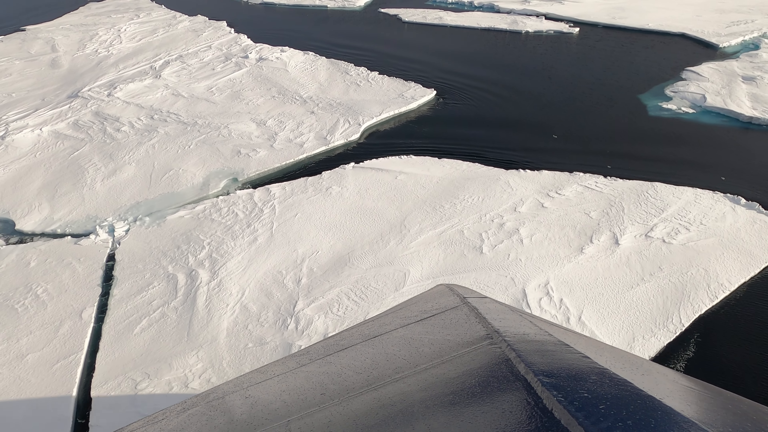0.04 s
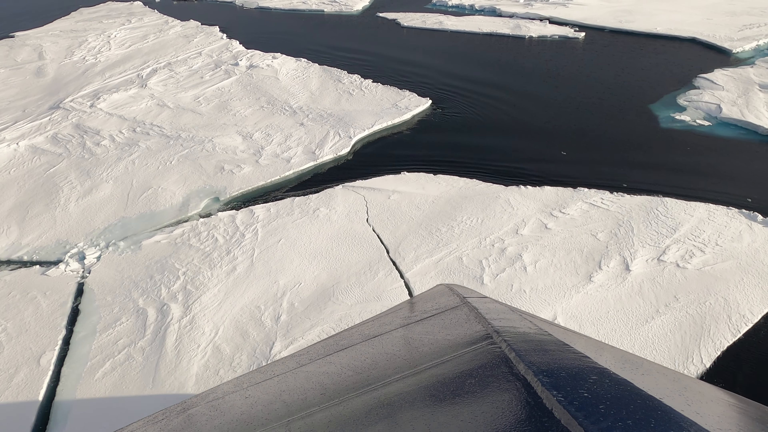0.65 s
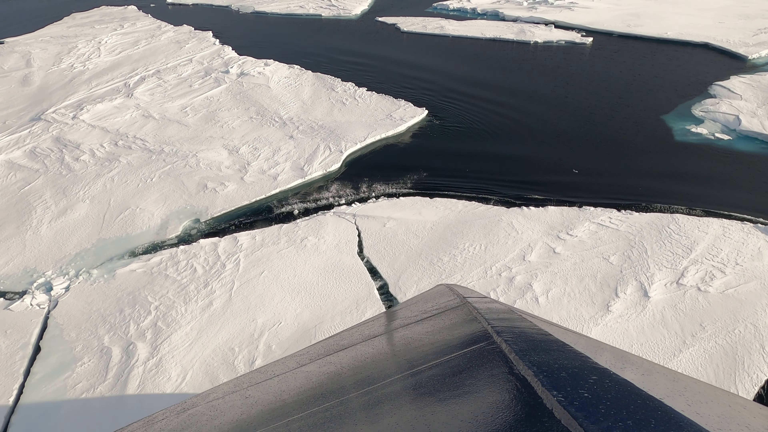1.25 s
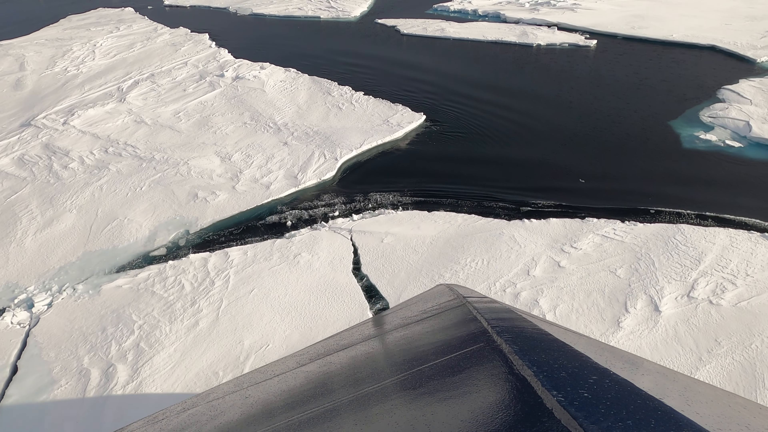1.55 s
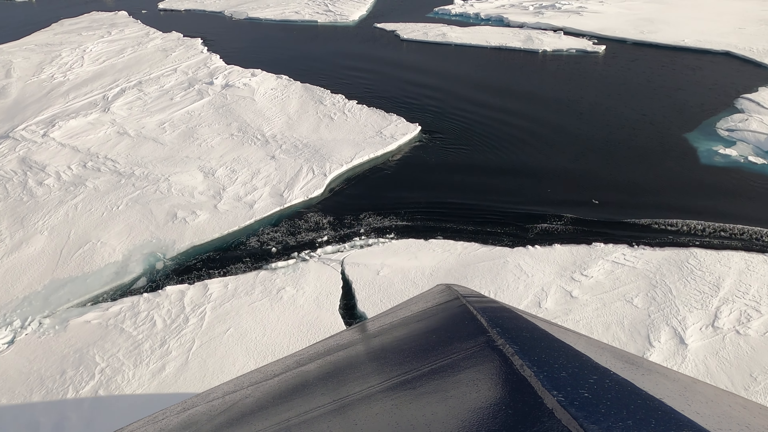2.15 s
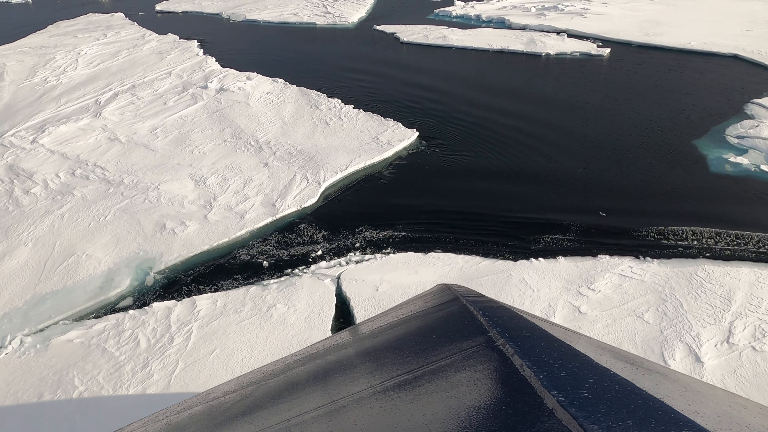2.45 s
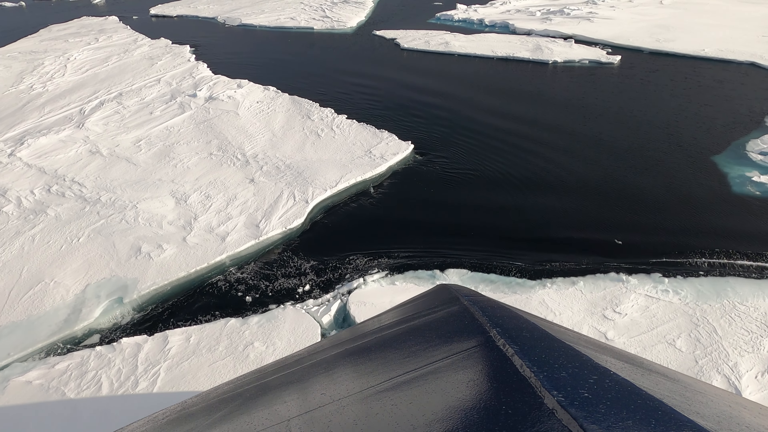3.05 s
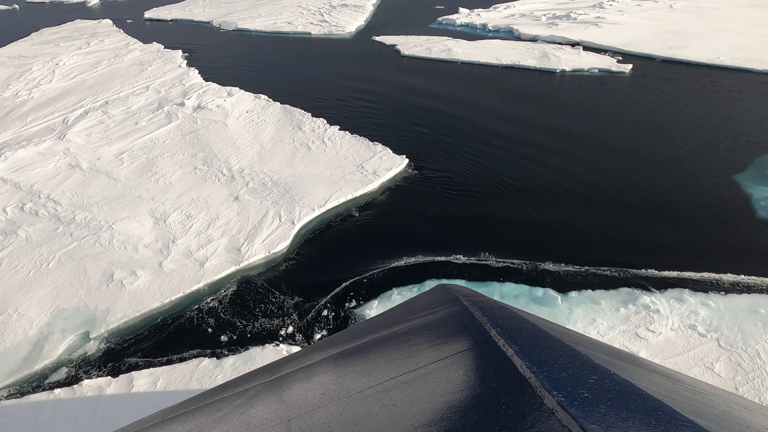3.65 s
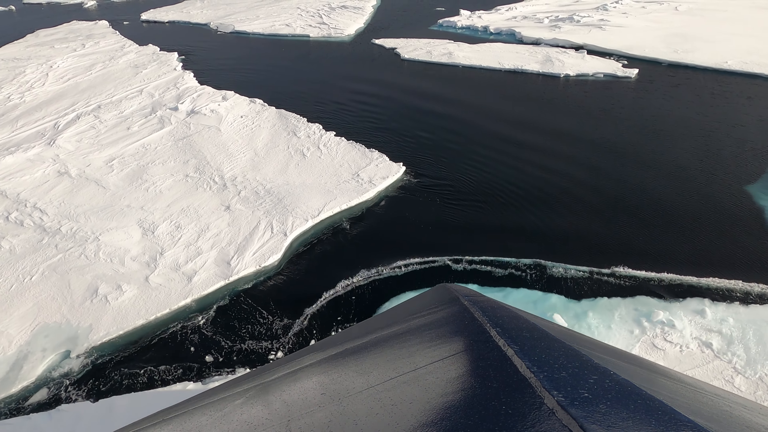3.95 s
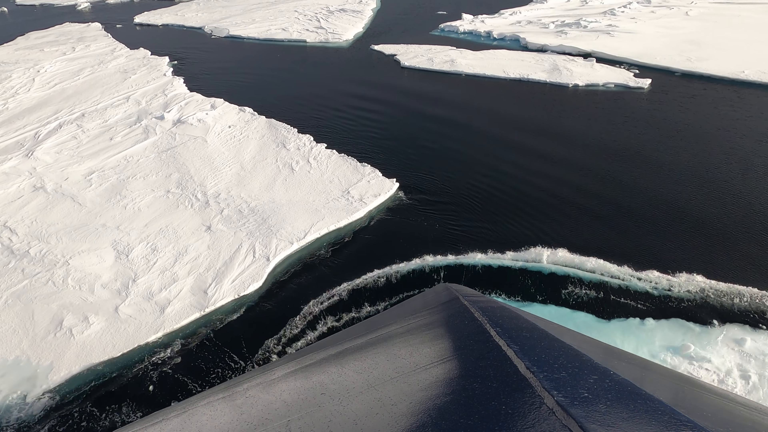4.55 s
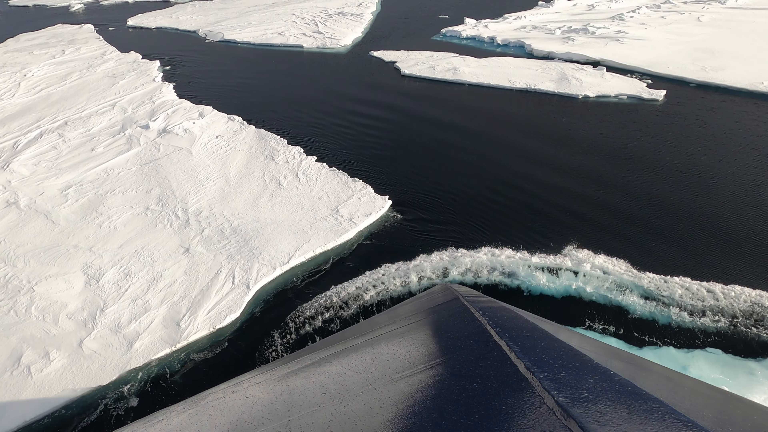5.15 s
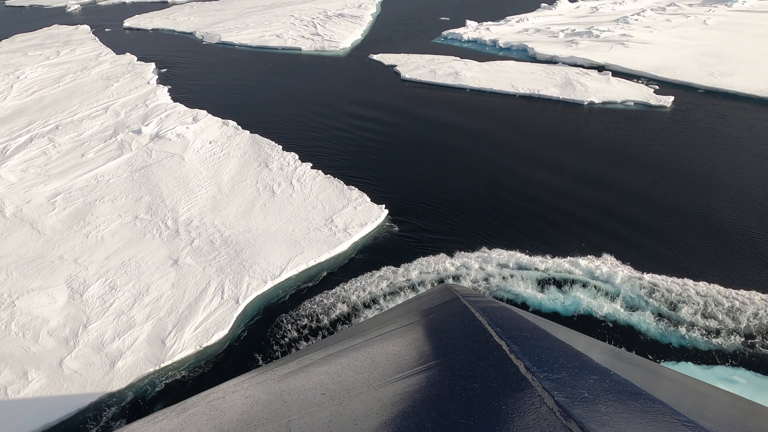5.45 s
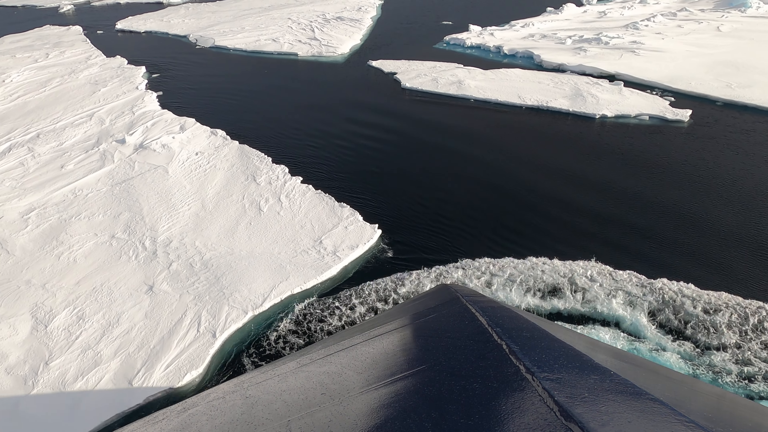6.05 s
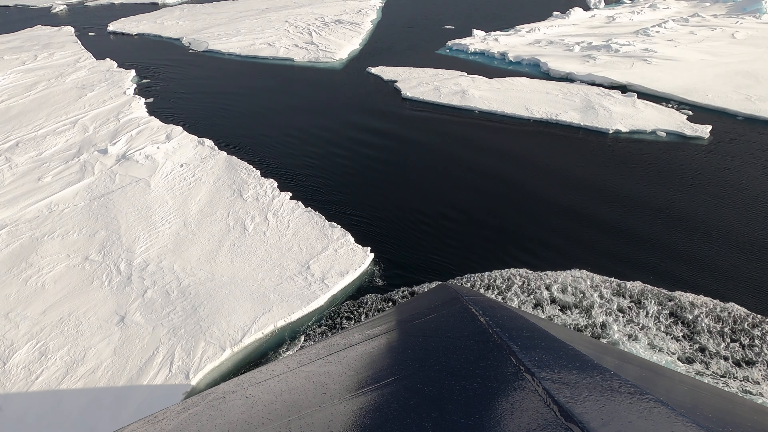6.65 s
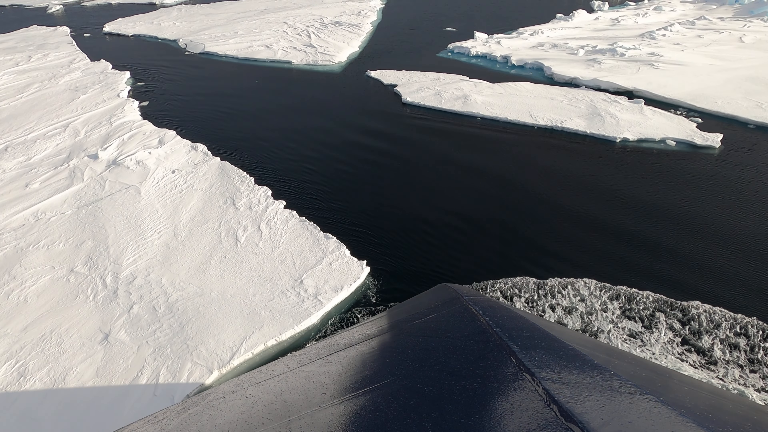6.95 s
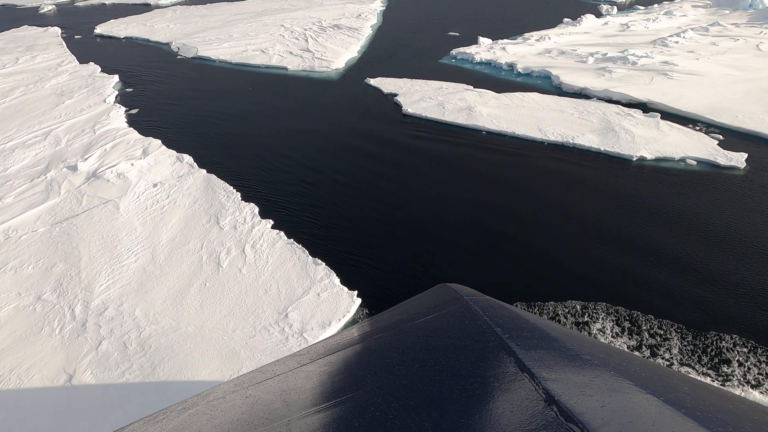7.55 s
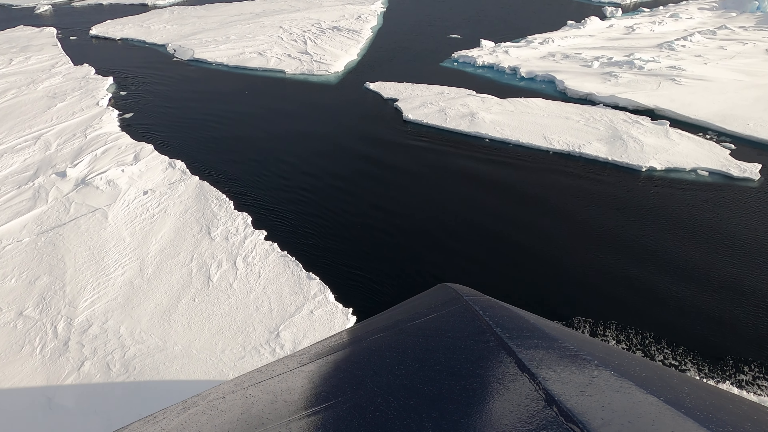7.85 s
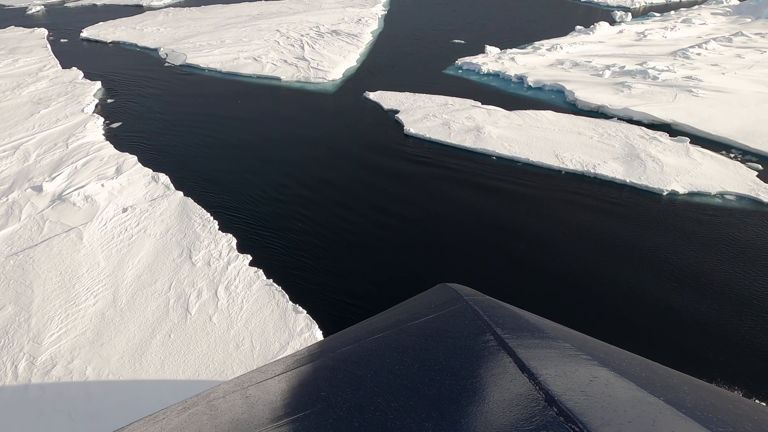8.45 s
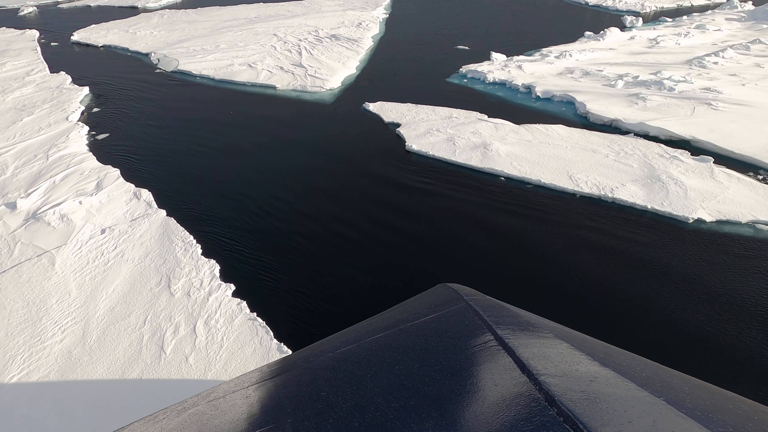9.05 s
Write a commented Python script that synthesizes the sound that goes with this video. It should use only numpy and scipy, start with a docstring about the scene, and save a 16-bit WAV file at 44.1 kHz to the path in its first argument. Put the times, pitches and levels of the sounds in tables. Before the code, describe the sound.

Heard on deck with low gusts of wind buffeting the microphone, ice crunches against a ship's steel bow, making it boom and groan. A second heavy crush follows, then dull thumps and a knock. Churning water swells into a fizzing, bubbling wash around the middle and slowly eases, with a few slaps, sharp little ice cracks and one faint last crunch.

```python
"""Booming and crunching in two long crushes: a ship's bow breaks through an ice floe, heard from the deck.
Fracturing ice drives the hull and the resonances of its plates; snow and slush hiss off the slabs.
Then the bow wave foams up with ringing bubbles, slaps against the next floe and settles.
Under it all, eddies of wind rumble on the microphone."""
import sys
import numpy as np
from scipy.fft import rfft, irfft, next_fast_len
from scipy.io import wavfile
from scipy.ndimage import uniform_filter1d, map_coordinates

SR = 44100
rng = np.random.default_rng(int(sys.argv[2]) if len(sys.argv) > 2 else 0)


def master(y):
    """Save y as 16-bit WAV."""
    cut = np.clip(np.atleast_2d(y).T, -1, 1)
    pcm = np.round(cut * 32767)  # scale
    wavfile.write(sys.argv[1], SR, pcm.astype(np.int16))


N = 410571

# the stem bites into a floe: start_s, hold_s, crunch_db, shaking_db, shaking_t60_s
CRUSHES = [(0, 0.82, -34.5, -19, 6.3), (0.899, 0.09, -50, -23, 2.7), (2.455, 0.22, -31.5, -18.5, 8.7),
           (2.6, .05, -33, -23.5, 6), (8.185, 0.13, -41, -29.5, 3.2)]
# spectrum of the booming hull: frequency_hz, density_db
BOOM_SPECTRUM = [(15, -21), (25, -19), (38, -4.5), (50, -1.5), (62, 1.5), (85, 0.5), (115, -1.5), (150, -7),
                 (210, -19), (400, -59), (800, -120)]
# strength of the bow wave relative to its crest: time_s, level_db
WAVE_STRENGTH = [(0, -20), (.3, -21), (1.1, -24.5), (1.45, -19), (1.9, -20), (2.55, -15.5), (3.0, -22),
                 (3.6, -17), (4.55, -7), (4.9, -0.1), (5.4, -1.35), (6.1, -8), (7.0, -10.5), (7.8, -13),
                 (8.2, -11), (8.55, -14), (9.31, -14.5)]


def amp(db):
    """Decibels to amplitude ratio."""
    return 10 ** (np.asarray(db) / 20)


def unit(x):
    """Normalisation to rms 1."""
    return x / np.sqrt(np.mean(x ** 2) + 1e-20)


def clock():
    """The time of each sample in seconds."""
    return np.arange(N) / SR


def curve(rows):
    """Linear interpolation of (time_s, value) rows at every sample."""
    return np.interp(clock(), *np.transpose(rows))


def wobble(rate_hz):
    """Slow random modulation: a spline through Gaussian knots."""
    return map_coordinates(rng.standard_normal(int(N * rate_hz / SR) + 4), [clock() * rate_hz])


def filtered(x, response):
    """Linear filtering: the spectrum is multiplied by a frequency response."""
    size = next_fast_len(N + SR // 2)
    return irfft(rfft(x, size) * response(np.fft.rfftfreq(size, 1 / SR)), size)[:N]


def coloured(x, spectrum):
    """Spectral shaping by (frequency_hz, density_db) rows, at rms 1."""
    knots_hz, db = np.transpose(spectrum)
    return unit(filtered(x, lambda hz: amp(np.interp(np.log(hz + 1), np.log(knots_hz), db))))


def noise():
    """Gaussian white noise."""
    return rng.standard_normal(N)


def crackle(per_s, spread_db):
    """Shot noise: impulses of uneven size at random moments, at rms 1."""
    happens = rng.random(N) < per_s / SR
    return unit(happens * np.sign(noise()) * amp(spread_db * np.clip(noise(), -2, 2)))


def steadied(x, evenness):
    """Envelope compression flattens the chance swells of a rumble, at rms 1."""
    power = np.abs(uniform_filter1d(uniform_filter1d(x ** 2, size=1500), size=1500)) + 1e-4
    return unit(x / power ** (evenness / 2))


def swells(rows):
    """The envelope of Gaussian swells; incoherent sounds add in power."""
    t = clock()
    return np.sqrt(sum(amp(db) ** 2 * np.exp(-((t - peak) / half) ** 2) for peak, db, half in rows))


def blow(start_s, rise_s, t60_s, hold_s=0):
    """An envelope that grows exponentially up to start_s, holds, then decays exponentially."""
    t = clock() - start_s
    return np.exp(np.minimum(t, 0) / rise_s) * amp(-60 * np.maximum(t - hold_s, 0) / t60_s)


def bursts(rows):
    """The envelope of several blows, added in power."""
    return np.sqrt(sum((amp(db) * blow(start, *shape)) ** 2 for start, db, *shape in rows))


def bubbles(low_hz, high_hz, cycles, rise, spread_db, count):
    """Each bubble is a damped oscillator whose pitch rises as it nears the surface."""
    when, tuning, loudness = rng.random((count, 3)).T[:, :, None]
    hz = low_hz * (high_hz / low_hz) ** tuning
    samples = np.arange(int(min(3 * cycles / low_hz, .03) * SR))
    age = hz * samples / SR / cycles
    phase = 2 * np.pi * cycles * (age + rise * (age - 1 + np.exp(-age)))
    envelope = np.exp(-2 * age) - np.exp(-20 * age)
    ring = amp(spread_db * loudness ** 3) * envelope * np.sin(phase)
    positions = (when * N).astype(int) + samples
    return unit(np.bincount(positions.ravel(), ring.ravel(), N)[:N])


def plates(x):
    """Modal resonance: the steel bow plates add their own ringing to what shakes them."""
    # plate modes, relative to the drive: pitch_hz, bandwidth_hz, gain_db
    modes = [(149, 10, -10), (212, 15, -3), (267.3, 6.2, -3), (317.5, 9.5, -1), (353.4, 14, -6),
             (445.5, 8, -6.5), (490, 28, -3.5), (615, 33, -7.5), (765, 26, -1.5), (874, 26, -3),
             (1090, 80, -3.5), (1440, 50, -5), (1760, 50, -8)]

    def response(f):
        return 1 + sum(amp(db) * 1j * f * width / (hz * hz - f * f + 1j * f * width)
                       for hz, width, db in modes)
    return filtered(x, response)


def wind(breeze_db=-38.5):
    """Turbulent pressure: eddies buffet the microphone in gusts over a steady breeze."""
    # gusts: peak_s, level_db, half_length_s
    gusts = [(.12, -28, .25), (1.6, -33, .15), (2.27, -29, .08), (3.05, -28, .2), (3.65, -24, .28),
             (4.8, -31, .1), (5.45, -25, .24), (5.81, -22.5, .05), (6.07, -26, .06), (6.21, -26.5, .035),
             (6.36, -27, .045), (6.6, -19.5, .06), (6.9, -22.5, .04), (7.19, -29, .09), (7.68, -29.5, .1),
             (8.63, -29.5, .2)]
    # buffeting: frequency_hz, density_db
    spectrum = [(5, -21.5), (15, -7.5), (26, -0.5), (38, -0.5), (49, -11.5), (62, -2.5), (100, -18),
                (300, -53.5), (1000, -120)]
    buffeting = steadied(coloured(noise(), spectrum), evenness=.17)
    return np.hypot(amp(breeze_db), swells(gusts)) * buffeting


def snow():
    """Snow and slush slide off the slabs; countless tiny impacts merge into a hiss."""
    # slides: peak_s, level_db, half_length_s
    slides = [(.26, -70, 0.05), (0.848, -58.5, 0.063), (1.02, -67, .1), (1.333, -52, 0.11),
              (1.48, -58, 0.032), (2.27, -60.5, 0.14), (2.5, -55.5, 0.084), (3.32, -62, .06),
              (4.41, -51.5, 0.035)]
    # hiss: frequency_hz, density_db
    spectrum = [(1200, -42), (2500, -22), (3400, 3), (4800, -0.5), (6000, -5.5), (7300, -14.5),
                (9500, -11.5), (11000, -18), (12000, -26.5), (15000, -38.5)]
    return swells(slides) * coloured(crackle(per_s=12000, spread_db=6), spectrum)


def foam(fizz_lag_s=.15):
    """Small bubbles resonate in the wash; the finest burst a little later as a fizz of shot noise."""
    # spray of the wash: frequency_hz, density_db
    spray_spectrum = [(400, -40.5), (1000, 3), (1800, 0.5), (3000, -0.5), (4000, -6), (5000, -12.5),
                      (6000, -17), (7200, -26), (10000, -36), (16000, -81.5)]
    # bursting bubbles: frequency_hz, density_db
    fizz_spectrum = [(2500, -32), (4500, 4.5), (6000, 4.5), (7200, 2), (8500, 3.5), (10000, -3),
                     (11000, -6.5), (12000, -14), (13500, -16.5), (15500, -26.5)]
    wave_db = curve(WAVE_STRENGTH)
    late_db = np.interp(clock() - fizz_lag_s, clock(), wave_db)
    lapping = amp(.48 * wobble(22))
    ringing = bubbles(low_hz=1384, high_hz=5030, cycles=9.9, rise=.086, spread_db=10.5, count=8000)
    spray = coloured(crackle(per_s=7000, spread_db=1), spray_spectrum)
    wash = amp(-31.5 + wave_db) * unit(spray + amp(-10) * ringing)
    fizz = amp(-50 + .9 * late_db) * coloured(crackle(per_s=7500, spread_db=0), fizz_spectrum)
    return lapping * (wash + fizz)


def bow_wave(crest_db=-30, growth=.58):
    """The wave tumbles over in turbulent noise and traps air that resonates as bubbles."""
    # tumbling water: frequency_hz, density_db
    spectrum = [(150, -44), (380, -1.5), (560, -3.5), (750, -5.5), (1150, -10), (1600, -15), (2400, -26.5),
                (5000, -58), (12000, -120)]
    gurgle = bubbles(low_hz=450, high_hz=2000, cycles=7, rise=.15, spread_db=11, count=5000)
    churn = unit(coloured(noise(), spectrum) + amp(-10) * gurgle)
    return amp(crest_db + growth * curve(WAVE_STRENGTH) + .47 * wobble(15)) * churn


def slaps():
    """Water impacts between bow and floe radiate bursts of broadband noise."""
    # slaps: peak_s, level_db, rise_s, t60_s
    impacts = [(7.343, -33.5, 0.017, 0.34), (7.415, -35, 0.011, 0.18), (7.437, -32, .015, 0.6),
               (7.478, -37, 0.0088, .1), (7.487, -35, .002, 0.087)]
    # splash: frequency_hz, density_db
    spectrum = [(150, -17), (500, 15.5), (1500, 2), (2500, 2), (3600, -3.5), (5000, -9), (8000, -19),
                (12000, -27), (16000, -51)]
    return bursts(impacts) * coloured(noise(), spectrum)


def thumps():
    """Impacts of swell and slabs excite the low-frequency response of the hull."""
    # thumps: peak_s, level_db, rise_s, t60_s
    impacts = [(2.42, -30, 0.027, 0.29), (3.31, -17, 0.091, 0.38), (3.75, -26.5, 0.15, 3.2),
               (4.07, -17, .01, 0.14), (5.8, -23, .012, .25), (6.44, -21, 0.0065, 0.18),
               (6.71, -17.5, 0.012, 0.48), (6.955, -19, 0.02, 0.2), (7.55, -21, 0.032, 0.35),
               (8.78, -27.5, 0.15, 0.55)]
    return bursts(impacts) * steadied(coloured(noise(), BOOM_SPECTRUM), evenness=.61)


def knock():
    """The impact of a loose block on the hull is a noise burst coloured by the plate modes."""
    # knock: peak_s, level_db, rise_s, t60_s
    impacts = [(4.106, -18.3, 0.013, 0.15)]
    # block on steel: frequency_hz, density_db
    spectrum = [(80, -4), (200, 4), (600, 1), (900, -4), (1250, -16), (1850, -18), (2400, -34), (4000, -46),
                (10000, -90)]
    return bursts(impacts) * coloured(plates(noise()), spectrum)


def snaps(attack_s=.0006):
    """Brittle fracture at the edge of the next floe: a crack, and the broken piece rings briefly."""
    # fractures: start_s, ring_db, pitch_hz, crack_db, t60_s
    fractures = [(7.3395, -27, 1500, -35, .01), (7.3448, -18.5, 3560, -25, .009),
                 (7.441, -33, 4400, -31, .012), (7.478, -28, 1200, -32, .014),
                 (7.4868, -19, 1500, -19, .008)]
    # crack: frequency_hz, density_db
    spectrum = [(300, -16), (1000, 4), (3500, -5), (6000, -16), (10000, -27), (13000, -42), (16000, -68)]
    out = np.zeros(N)
    t = np.arange(SR // 10) / SR
    attack = 1 - np.exp(-t / attack_s)
    for start, ring_db, hz, crack_db, t60 in fractures:
        ring = amp(ring_db) * np.sin(2 * np.pi * hz * t)
        crack = amp(crack_db) * coloured(noise(), spectrum)[:len(t)]
        out[round(start * SR):][:len(t)] += attack * amp(-60 * t / t60) * (ring + crack)
    return out


def groans(waver_hz=2.31, flutter_db=2.5):
    """Friction of dragging ice sustains a hull resonance, whose pitch drifts as the load shifts."""
    # groans: centre_s, length_s, pitch_hz, glide_hz_per_s, level_db
    tones = [(.26, .34, 97, 0, -17), (.54, .14, 81, 0, -19.5), (.76, .2, 92, -80, -19.5),
             (.98, .26, 182, 35, -20.5), (1.32, .27, 151, 0, -20), (1.56, .16, 75, -90, -23),
             (1.78, .36, 151, 0, -26), (2.26, .1, 60, 0, -23), (2.56, .3, 80.5, 0, -15),
             (2.52, .28, 216, -10, -23.5), (2.52, .17, 322, 0, -20.5), (2.72, .16, 318, 0, -23),
             (2.75, .3, 264, 0, -26), (2.85, .32, 73, -45, -15.8), (3.32, .22, 100, 0, -21.5),
             (3.8, .5, 70, 0, -24), (8.25, .3, 190, 30, -35)]
    out = np.zeros(N)
    for centre, length, hz, glide, db in tones:
        t = clock() - centre
        swell = np.exp(-(2 * t / length) ** 4)
        phase = 2 * np.pi * np.cumsum(hz + glide * t + waver_hz * wobble(30)) / SR
        out += amp(db + flutter_db * wobble(15)) * swell * np.sin(phase)
    return out


def crunch(bite_s, t60_s=1.73):
    """Ice fails in compression: a dense train of tiny fractures excites the plate modes."""
    # crunching ice: frequency_hz, density_db
    spectrum = [(200, -33.5), (400, -2.5), (520, -3.5), (720, -1), (880, -6), (1100, -5), (1400, -11.5),
                (2000, -20), (3500, -45.5), (8000, -62), (16000, -120)]
    crushing = bursts((start, db, bite_s, t60_s, hold) for start, hold, db, _, _ in CRUSHES)
    flutter = amp(.5 * wobble(25))
    return crushing * flutter * coloured(plates(crackle(per_s=4000, spread_db=1)), spectrum)


def shaking(bite_s, decay_share):
    """Damping: the vibration envelope of a hull part that rings for a share of each crush's decay time."""
    return bursts((start, db, bite_s, decay_share * t60, hold) for start, hold, _, db, t60 in CRUSHES)


def hull(bite_s):
    """Forced vibration: crushes and dragging slabs make the whole bow boom and its plating rattle."""
    # slabs and water dragging along the hull: time_s, level_db
    drag = [(0, -44), (1.7, -28), (2.2, -31), (3.2, -23), (3.85, -26), (4.5, -24.5), (5, -26), (5.55, -26),
            (6.1, -31), (6.9, -33), (7.25, -35.5), (7.9, -35), (8.8, -34.5), (9.31, -38)]
    # rattling plating: frequency_hz, density_db
    rattle_spectrum = [(70, -36.5), (130, -4), (165, 2), (215, -0.5), (265, 0), (320, -2.5), (400, -5.5),
                       (480, -11.5), (700, -19.5), (1500, -37), (4000, -120)]
    drag_db = curve(drag)
    boom = steadied(coloured(noise(), BOOM_SPECTRUM), evenness=.58)
    fractures = crackle(per_s=2500, spread_db=3)
    rattle = steadied(coloured(plates(fractures), rattle_spectrum), evenness=.1)
    boom_envelope = np.hypot(shaking(bite_s, decay_share=1), amp(drag_db + 1))
    rattle_envelope = np.hypot(amp(-1) * shaking(bite_s, decay_share=.45), amp(drag_db))
    return boom_envelope * boom + rattle_envelope * rattle


def scene():
    """Superposition of all sources at the deck, in one channel."""
    bite_s = .047  # time constant with which a crush builds up
    icebreaking = hull(bite_s) + groans() + crunch(bite_s) + snow() + knock() + snaps()
    water = bow_wave() + slaps() + thumps() + foam()
    return (icebreaking + water + wind())[None]


def record(dry):
    """Soft saturation rounds off the highest peaks; a low-pass filter limits the bandwidth."""
    ceiling, top_hz = .64, 15600
    rounded = dry[0] / (1 + np.abs(dry[0] / ceiling) ** 6) ** (1 / 6)
    return filtered(rounded, lambda hz: hz < top_hz)[None]


dry = scene()
out = record(dry)
master(out)
```